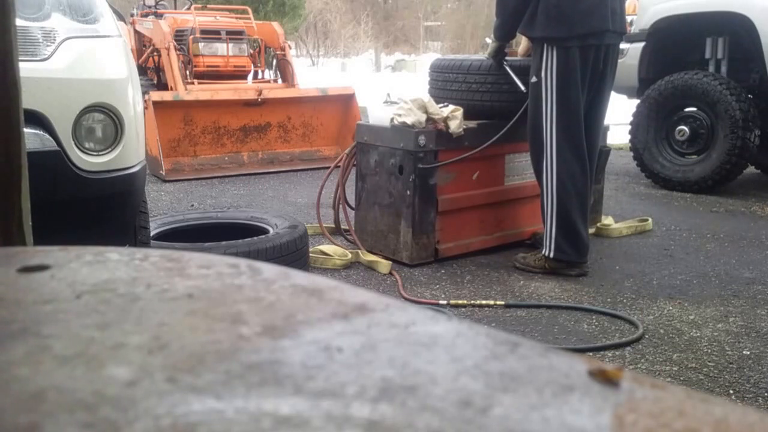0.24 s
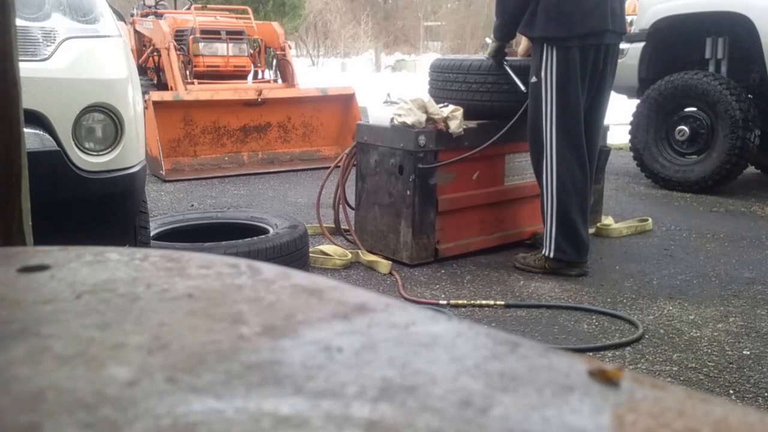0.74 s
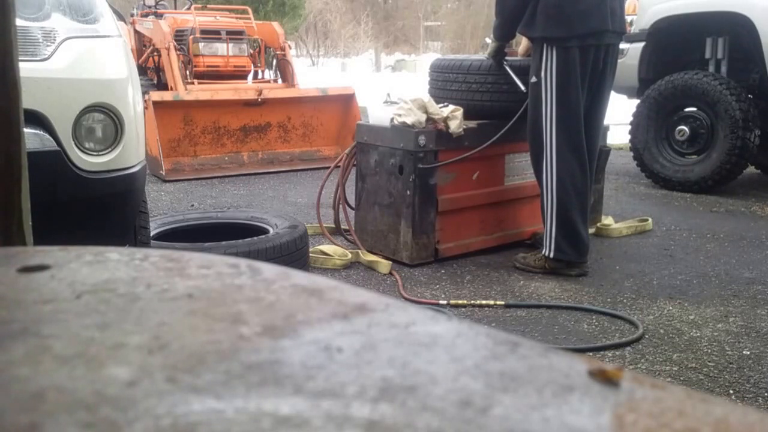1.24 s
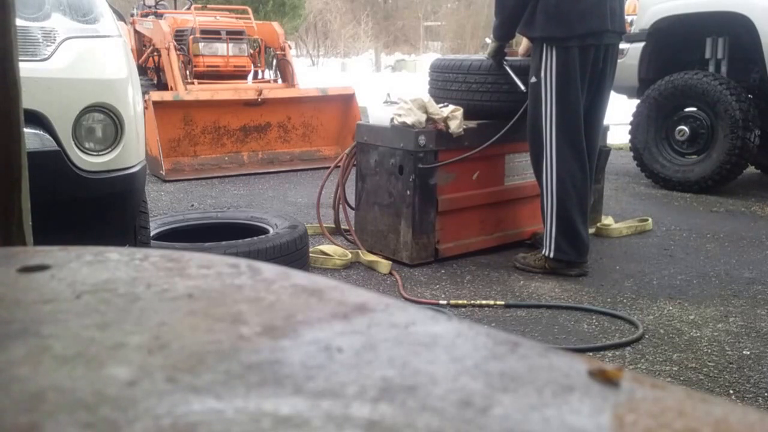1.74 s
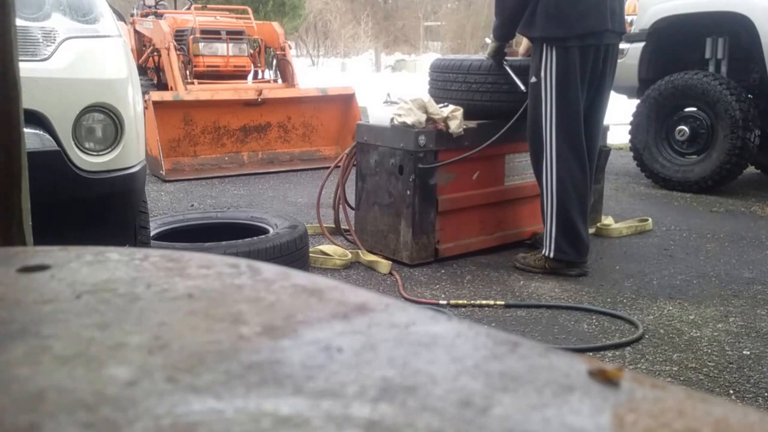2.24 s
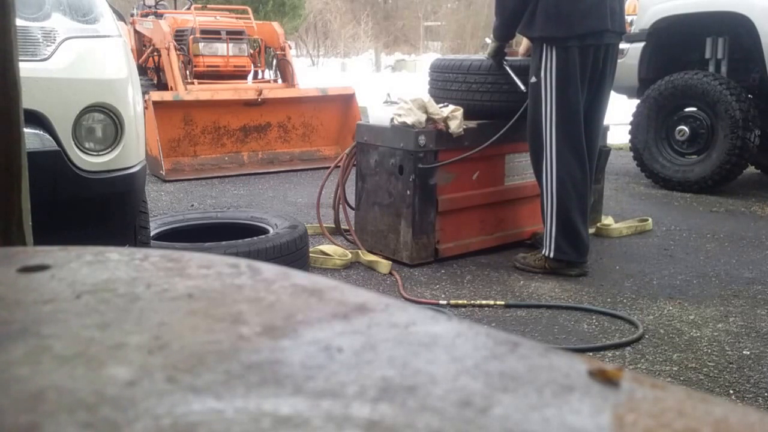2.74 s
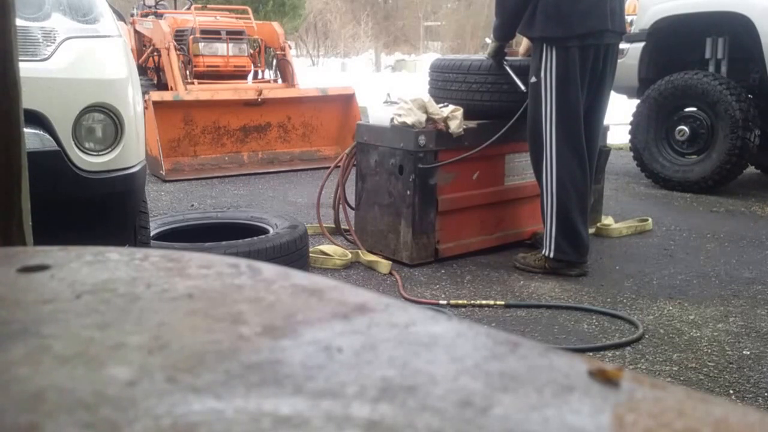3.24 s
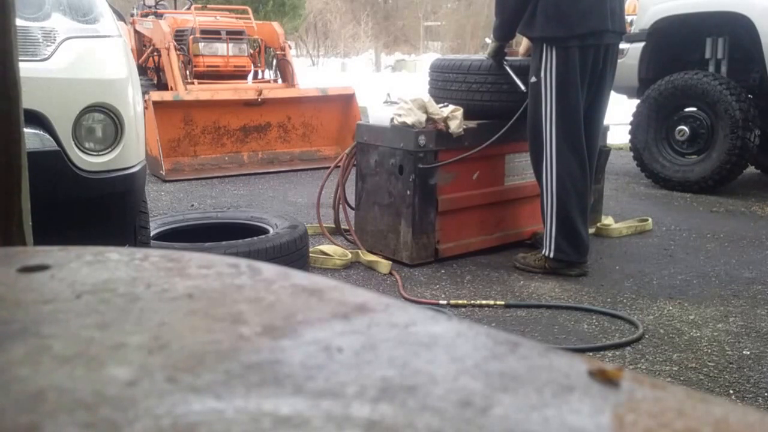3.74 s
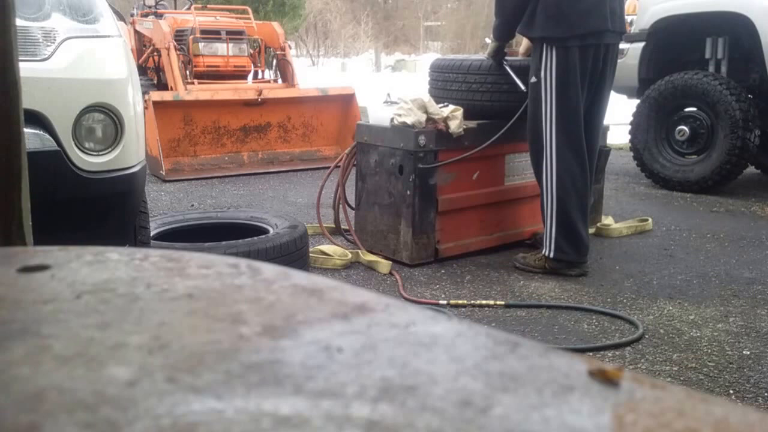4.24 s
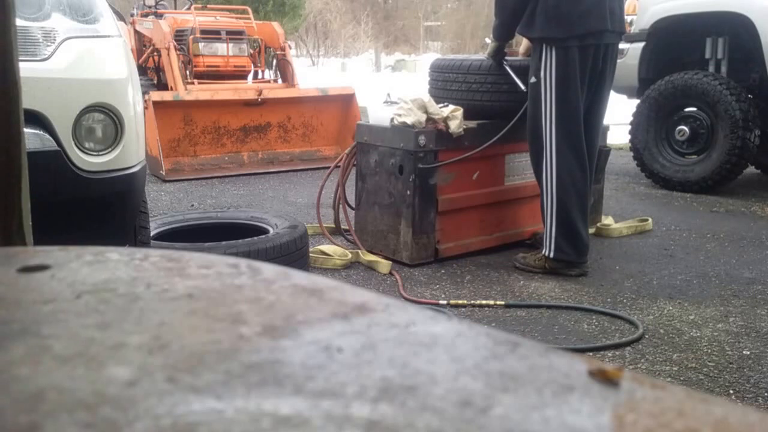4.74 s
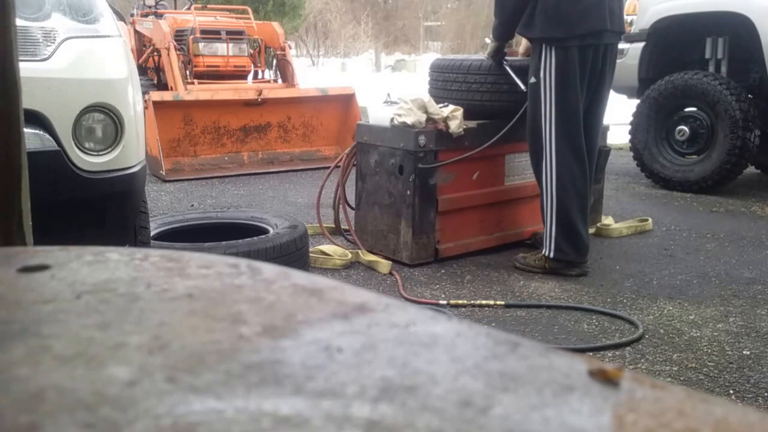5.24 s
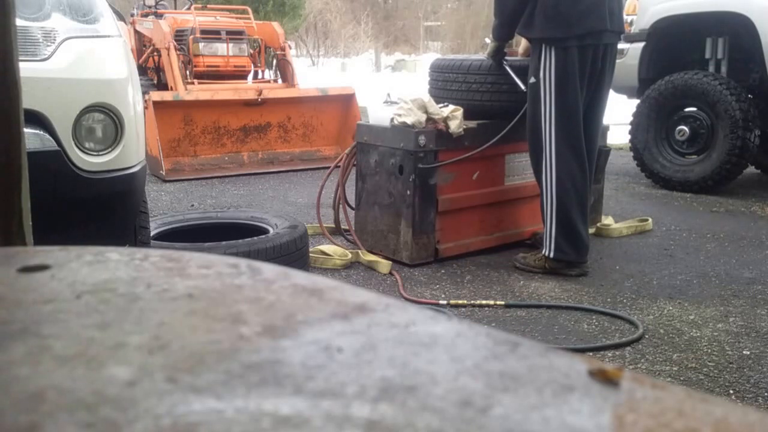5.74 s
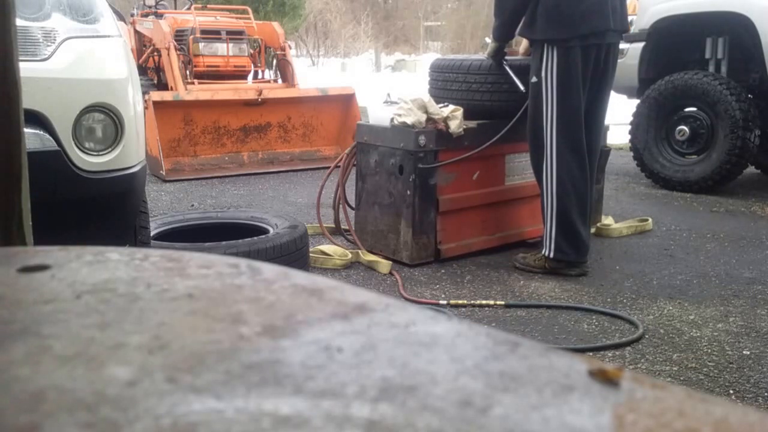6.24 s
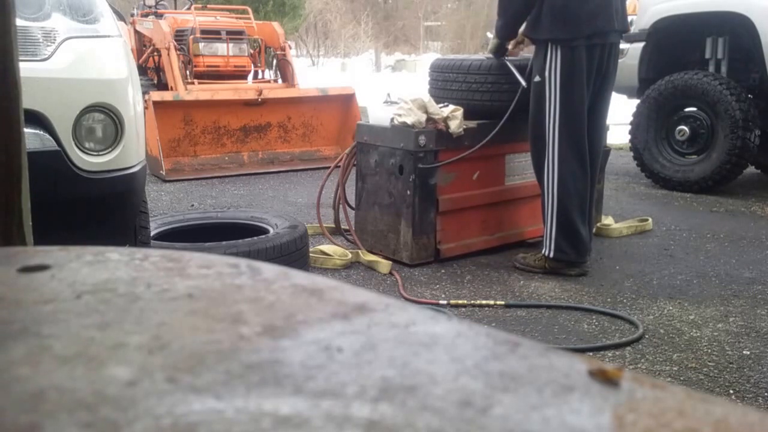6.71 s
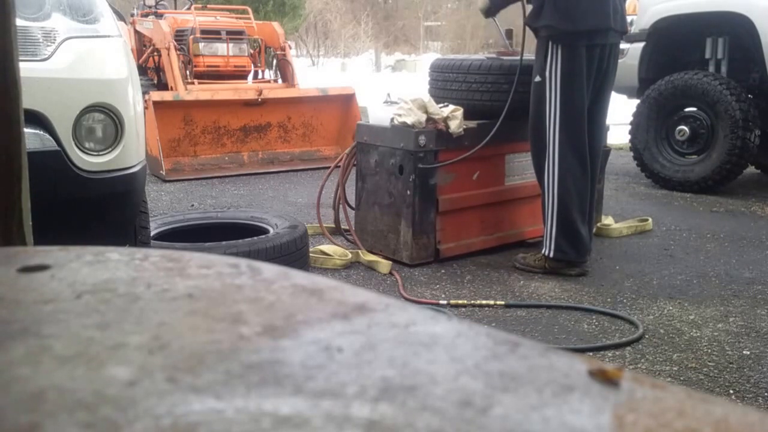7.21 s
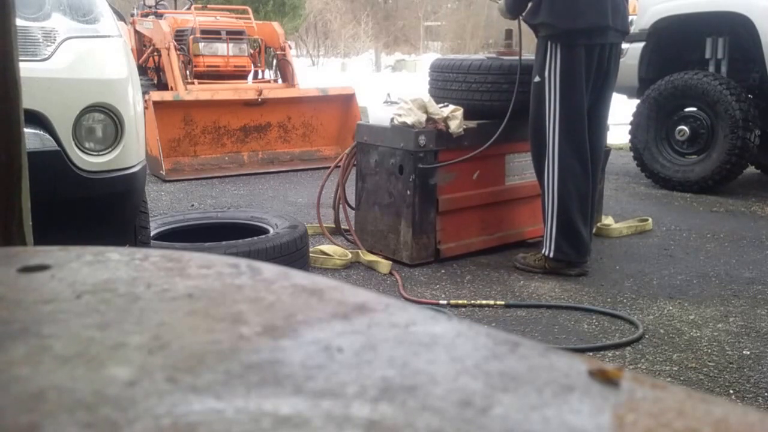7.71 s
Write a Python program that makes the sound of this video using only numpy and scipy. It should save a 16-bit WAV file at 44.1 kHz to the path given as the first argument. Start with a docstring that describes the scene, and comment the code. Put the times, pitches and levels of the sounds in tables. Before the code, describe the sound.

Steady, fast chattering air compressor hum with hissing intake and metallic ticking on a driveway; late on, a tire chuck pops off with a brief hiss.

```python
"""On a driveway, a belt-driven piston air compressor runs steadily while a tire is filled.
Its pump drones as a periodic wave on the crank orders; reed valves tick and flutter by ringing the head.
Shaped noise gives the fan rumble and intake rush; unsteady sine tones give the motor hum.
Near the end the chuck comes off the tire valve with a short puff of noise and a thin whistle."""
import sys
import numpy as np
from scipy import signal
from scipy.fft import rfft, irfft, next_fast_len
from scipy.io import wavfile
from scipy.ndimage import map_coordinates

SR = 44100
rng = np.random.default_rng(int(sys.argv[2]) if len(sys.argv) > 2 else 0)


def transcribe(u):
    """Save the signal u as a 16-bit wav file named by the first command-line argument.

    u: samples, shape (n,) or (channels, n), limited to [-1, 1]; the rate is SR.
    q: integer samples, one column per channel.
    """
    v = np.clip(np.atleast_2d(u).T, -1, 1)
    q = np.round(v * 32767).astype(np.int16)
    wavfile.write(sys.argv[1], SR, q)


N = 351465

CRANK_HZ = 13.9433  # mean revolutions per second
TOP_HZ = 15720  # upper band limit
PUFF_S, PUFF_DB = 6.58, -34.5  # the chuck starts to lift; level of the jet when fully open
# the gap opens, stays open, then the valve closes
PUFF_ATTACK_S, PUFF_HOLD_S, PUFF_FALL_DB_PER_S = .048, .016, 320

# Turbulence of flywheel fan and pump body: [f/Hz, relative density/dB per Hz]
FAN_SPECTRUM = [(20, -34), (42, -27), (58, -16), (80, -3.5), (130, -1), (280, -1), (380, -7), (550, -6.5),
                (700, -2), (790, -10), (880, -5.5), (1100, -13.5), (2000, -20), (5000, -52)]
# Air drawn through the intake: [f/Hz, relative density/dB per Hz]
INTAKE_SPECTRUM = [(300, -18), (1000, -2.5), (1500, 0.5), (1750, -3), (2400, 1.5), (3200, 1), (4450, -3),
                   (4900, -9), (5600, -14), (6700, -14.5), (7300, -19.5), (11000, -15), (12800, -16),
                   (15600, -19.5)]
# Air jet at the chuck: [f/Hz, relative density/dB per Hz]
JET_SPECTRUM = [(1500, -15), (3500, 6.5), (4600, 2.5), (5300, 5), (6500, -6), (8900, -4), (9600, -0.5),
                (11200, -8), (12100, 2), (12800, -4), (14800, -3), (15400, -4)]
# Motor and belt tones: [f/Hz, mean rms level/dB]
MOTOR_TONES = [(45.3, -64), (90.7, -45.5), (119.6, -44), (388.5, -54.5), (692.7, -46), (719.8, -44),
               (747.7, -49.5), (1437.9, -53.5)]
# Reed valves, each a snap and its flutter:
# [snap/turn 0-1, relative level/dB, flutter f/Hz, loss per contact/dB]
REED_VALVES = [(.937, 0.5, 340, 1.2), (.427, -6, 340, 12), (.515, -3, 258, 2.5)]
# Resonances of valve plate and cylinder head: [f/Hz, width/Hz, relative level/dB]
HEAD_MODES = [(5890, 55, -9), (6810, 130, -3), (8380, 170, 0), (9300, 90, -23), (10130, 130, 1),
              (10460, 150, -2), (10630, 156, 8), (10970, 97, 3), (11450, 52, -2), (11800, 98, -11),
              (12140, 110, -18), (13200, 400, -18)]
# Piston strokes within one revolution: [t/turn 0-1, relative level/dB]
PISTON_STROKES = [(.09, 0), (.66, -4)]
# Mean level of the crank orders between resonances: [f/Hz, rms level of each order/dB]
ORDER_LEVELS = [(42, -85), (56, -55.5), (85, -58), (125, -51), (230, -60), (400, -51.5), (560, -54),
                (850, -63), (1300, -61.5), (2500, -66), (3500, -64.5), (4400, -70), (6000, -84)]
# Tank and frame resonances, lifting nearby crank orders: [f/Hz, width/Hz, rms level at centre/dB]
TANK_MODES = [(194, 17, -45.5), (251, 5, -34), (307, 13, -43.5), (337, 20, -43), (460, 7, -45),
              (550.4, 10.4, -44), (627.5, 7.8, -43.5), (707.4, 12, -42), (976, 6, -53), (1005, 12.8, -46.5),
              (1060, 6, -53.5), (1241, 8.2, -49), (1510, 7, -51.5)]


def amp(db):
    """Definition of level: decibels to amplitude ratio."""
    return 10 ** (np.asarray(db) / 20)


def unit(x):
    """Normalisation: x at rms 1."""
    return x / np.sqrt(np.mean(x ** 2) + 1e-20)


def along(points, hz):
    """Interpolation of (f/Hz, level/dB) points on a logarithmic frequency axis."""
    f, level = np.transpose(points)
    return np.interp(np.log(hz + 1), np.log(f + 1), level)


def wobble(rate):
    """Slow random modulation: a smooth curve through random knots, rate of them a second."""
    knots = rng.standard_normal(int(N * rate / SR) + 4)
    return map_coordinates(knots, [np.arange(N) * rate / SR])


def filtered(x, response):
    """Linear filtering: the spectrum of x times a complex response of frequency."""
    m = next_fast_len(N + SR // 2)
    hz = np.fft.rfftfreq(m, 1 / SR)
    return irfft(rfft(x, m) * response(hz), m)[:N]


def rush(spectrum):
    """Turbulence as random noise: white noise shaped by a spectrum, then set to rms 1."""
    white = rng.standard_normal(N)
    return unit(filtered(white, lambda hz: amp(along(spectrum, hz))))


def ring(x, modes):
    """Modal superposition: x drives parallel damped resonators (f/Hz, width/Hz, level/dB)."""
    def response(f):
        return sum(amp(db) * 1j * f * width / (centre ** 2 - f ** 2 + 1j * f * width)
                   for centre, width, db in modes)
    return filtered(x, response)


def walls(x, echo_db=-6, first_s=.004, spread_s=.03, count=40):
    """Comb filtering by reflection: weak early echoes off garage and vehicles."""
    response = np.zeros(SR // 4)
    delay_s = first_s + spread_s * rng.random(count)
    size = rng.standard_normal(count)
    response[(delay_s * SR).astype(int)] = amp(echo_db) * size / np.linalg.norm(size)
    response[0] = 1  # direct sound
    return signal.fftconvolve(x, response / np.linalg.norm(response))[:N]


def air(turns, rumble_db=-34.0, intake_db=-35.5, surge=0.075, surge_turn=0.13):
    """Turbulent flow noise: steady fan rumble, and intake hiss that surges twice a revolution."""
    pulsation = 1 + surge * np.cos(4 * np.pi * (turns - surge_turn))
    rumble = amp(rumble_db) * rush(FAN_SPECTRUM)
    intake = amp(intake_db) * pulsation * rush(INTAKE_SPECTRUM)
    return rumble + intake


def motor(drift_rad=0.22, waver_db=1):
    """Modulated sinusoids: magnetic hum, slot whine and belt tones, unsteady in phase and level."""
    t = np.arange(N) / SR
    total = np.zeros(N)
    for hz, db in MOTOR_TONES:
        level = amp(db + waver_db * wobble(4.06))
        phase = 2 * np.pi * (hz * t + rng.random()) + drift_rad * wobble(3.02)
        total += level * np.sqrt(2) * np.sin(phase)
    return total


def chuck(whistle_db=-45, whistle_s=6.622, whistle_width_s=.014):
    """Jet noise as the chuck leaves the valve stem, with a brief thin whistle of narrow-band noise."""
    t = np.arange(N) / SR
    opening = np.clip((t - PUFF_S) / PUFF_ATTACK_S, 0, 1)
    closing_s = np.maximum(t - PUFF_S - PUFF_ATTACK_S - PUFF_HOLD_S, 0)
    jet = opening * amp(PUFF_DB - PUFF_FALL_DB_PER_S * closing_s) * rush(JET_SPECTRUM)
    # the whistle peaks while the gap is still opening
    whistle = unit(ring(rng.standard_normal(N), [(15380, 250, 0)]))
    swell = np.exp(-((t - whistle_s) / whistle_width_s) ** 2)
    return jet + amp(whistle_db) * swell * whistle


def valves(turns, vary_db=1.0, ring_db=-47.0, sizzle_db=-62, buzz_db=-1.5, spurt_db=-8,
           spurt_s=.0018, lead_s=.0013, count=7):
    """Impact excitation: each reed snaps once a revolution, then flutters ever more weakly."""
    blows = np.zeros(N)
    for turn, db, flutter_hz, loss_db in REED_VALVES:
        for k in range(count):
            contact_turn = turn + k * CRANK_HZ / flutter_hz
            at = np.flatnonzero(np.diff(np.floor(turns - contact_turn)))
            blows[at] += amp(db - k * loss_db + vary_db * rng.standard_normal(len(at)))
    # air spurts through the gap just before the loudest reed, in the first row, snaps
    lifted = (turns - REED_VALVES[0][0] + lead_s * CRANK_HZ) % 1
    spurt = unit(np.exp(-lifted / CRANK_HZ / spurt_s) * rng.standard_normal(N))
    # contacts, spurts and steadily passing air ring the head
    buzz = amp(buzz_db) * rng.standard_normal(N)
    head = ring(unit(blows) + amp(spurt_db) * spurt + buzz, HEAD_MODES)
    # a treble sizzle thins out over each revolution
    sizzle = np.exp(-2 * lifted) * rush([(4000, -25), (8000, -5), (13000, 0), (16000, 0)])
    return amp(ring_db) * unit(head) + amp(sizzle_db) * unit(sizzle)


def crank():
    """Rotation with slip: revolutions so far, as the belt lets the pump lead and lag very slightly."""
    slip_s = 6e-5 * wobble(1) + 3e-5 * wobble(14)
    return CRANK_HZ * (np.arange(N) / SR + slip_s)


def pump(turns, scatter_db=2, stroke_s=.013):
    """Fourier series of a periodic source: one pressure wave, built of crank orders, every revolution."""
    size = 8192  # points in one cycle
    orders = np.arange(size // 2 + 1)
    hz = orders * CRANK_HZ
    thrum = amp(along(ORDER_LEVELS, hz) + scatter_db * rng.standard_normal(len(orders)))
    tank = np.max([amp(db) / np.hypot(1, 2 * (hz - centre) / width)
                   for centre, width, db in TANK_MODES], axis=0)
    gain = np.maximum(thrum, tank) * (orders > 3) * (hz < ORDER_LEVELS[-1][0])
    # each stroke is a dying burst of gas; it times the middle orders, while the others stay diffuse
    angle = np.arange(size) / size
    gas = sum(amp(db) * np.exp(-((angle - turn) % 1) / CRANK_HZ / stroke_s)
              for turn, db in PISTON_STROKES)
    timed = np.angle(rfft(gas * rng.standard_normal(size)))
    diffuse = 2 * np.pi * rng.random(len(orders))
    phase = np.where((orders > 13) & (orders < 60), timed, diffuse)
    cycle = irfft(gain * np.exp(1j * phase)) * size / np.sqrt(2)  # gain is the rms of each order
    return map_coordinates(cycle, [turns % 1 * size], order=1, mode="grid-wrap")


def scene():
    """Superposition of the compressor's sources and the puff; echoes follow valves and air only."""
    turns = crank()
    reflected = walls(valves(turns) + air(turns))
    return (reflected + motor() + chuck() + pump(turns))[None]


def record(dry):
    """Band limitation: nothing at or above TOP_HZ passes."""
    return np.array([filtered(x, lambda hz: hz < TOP_HZ) for x in dry])


dry = scene()
out = record(dry)
transcribe(out)
```